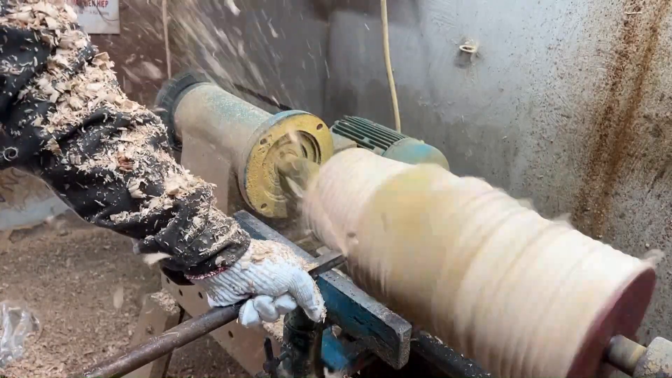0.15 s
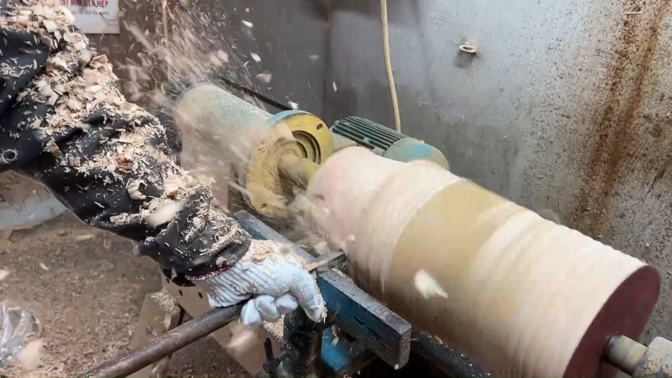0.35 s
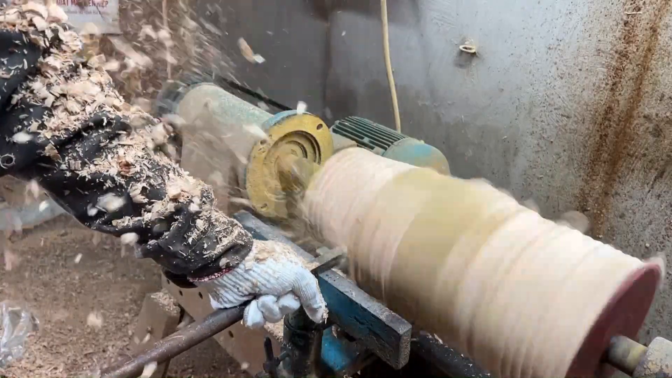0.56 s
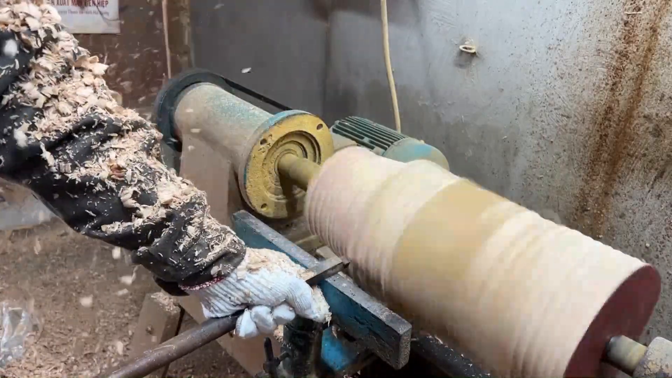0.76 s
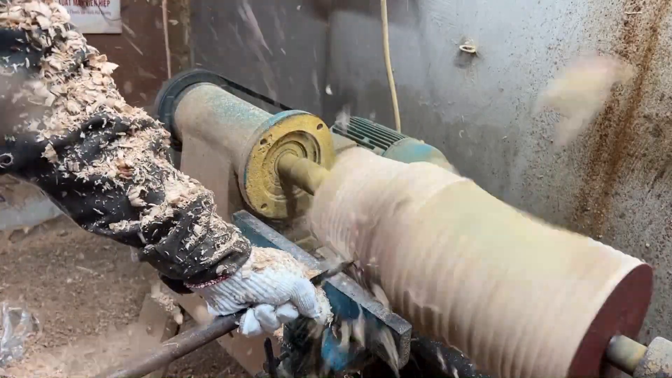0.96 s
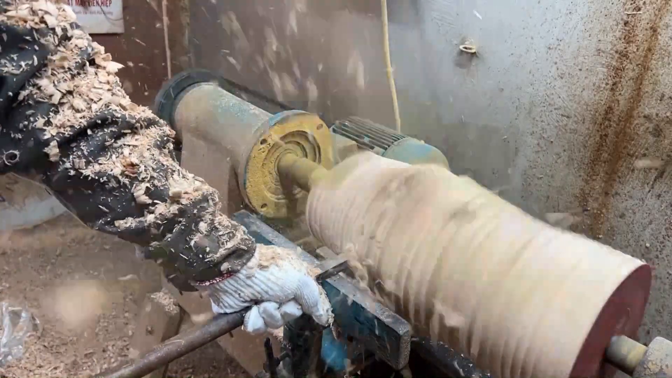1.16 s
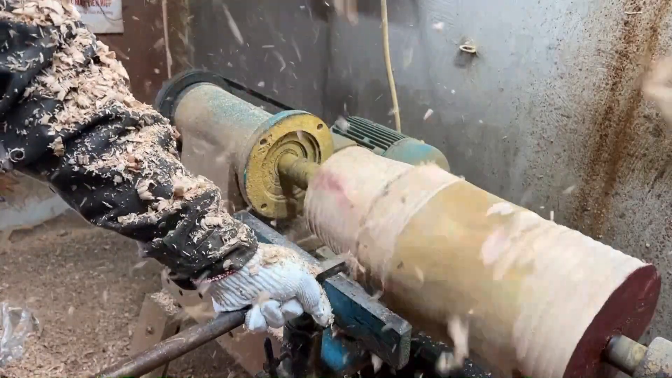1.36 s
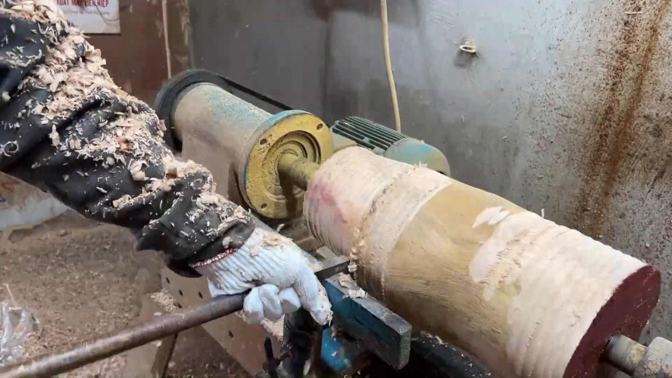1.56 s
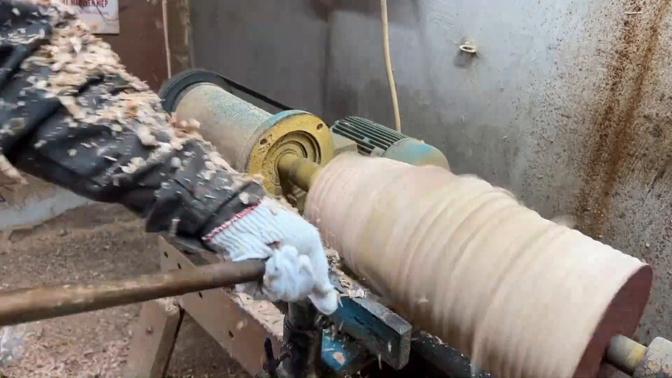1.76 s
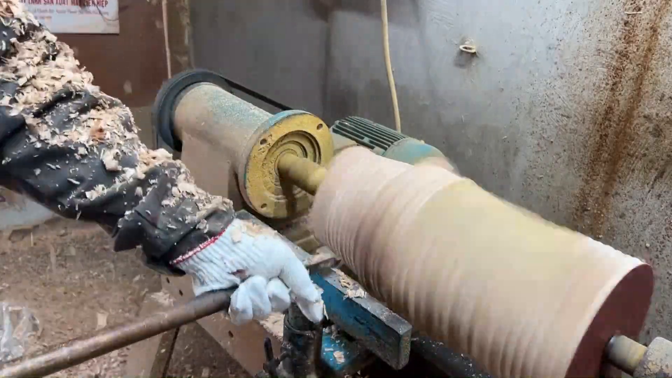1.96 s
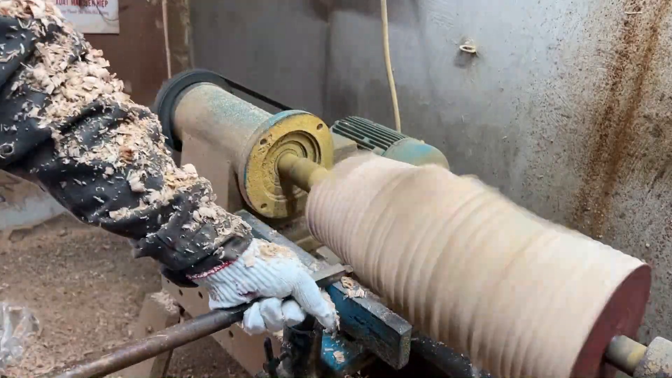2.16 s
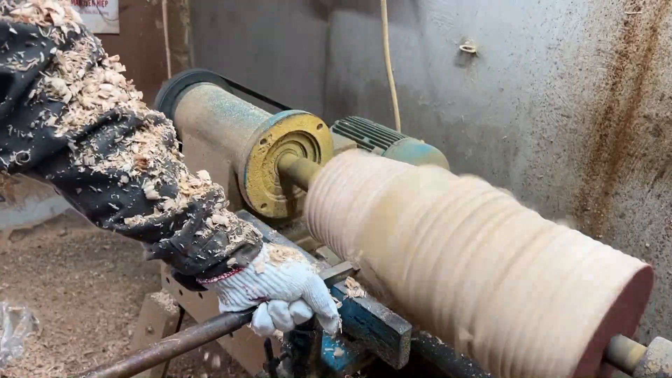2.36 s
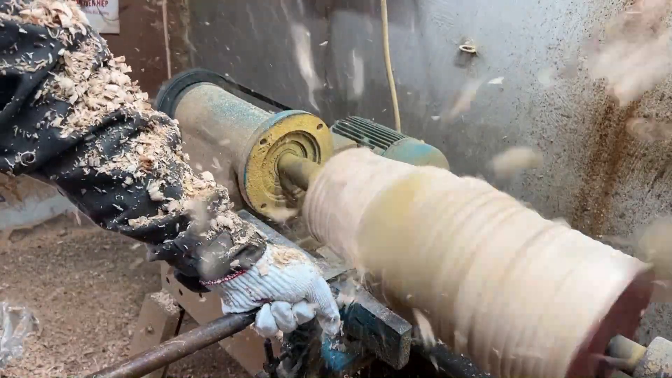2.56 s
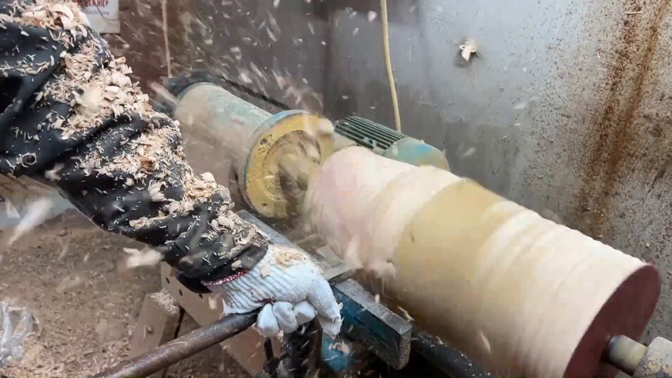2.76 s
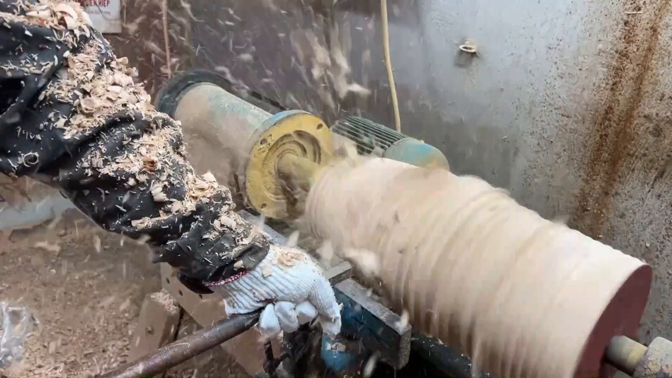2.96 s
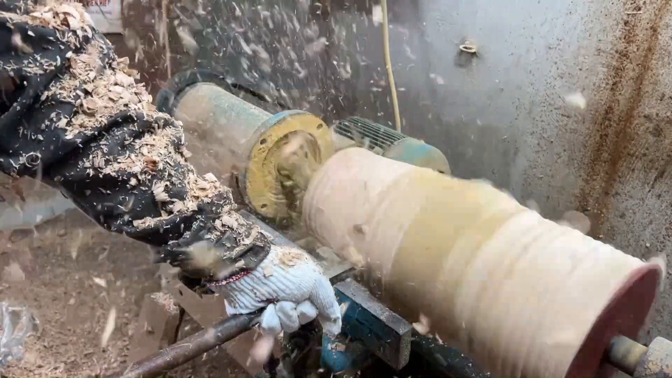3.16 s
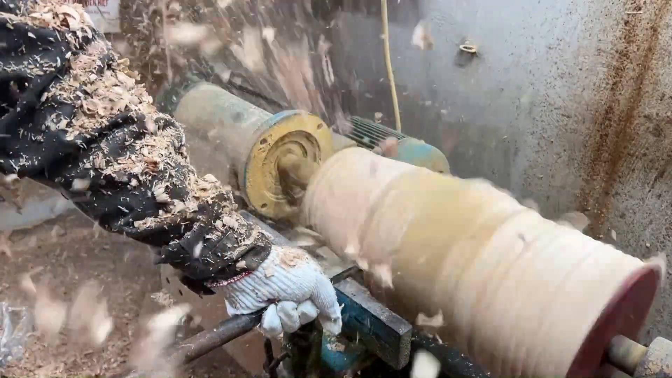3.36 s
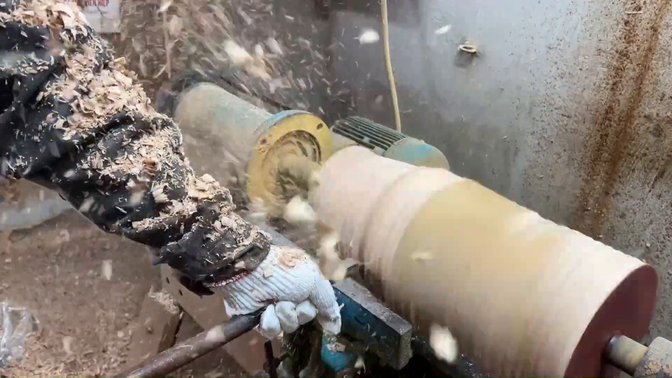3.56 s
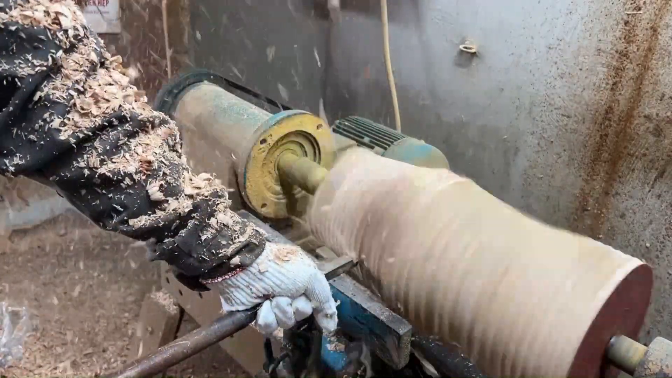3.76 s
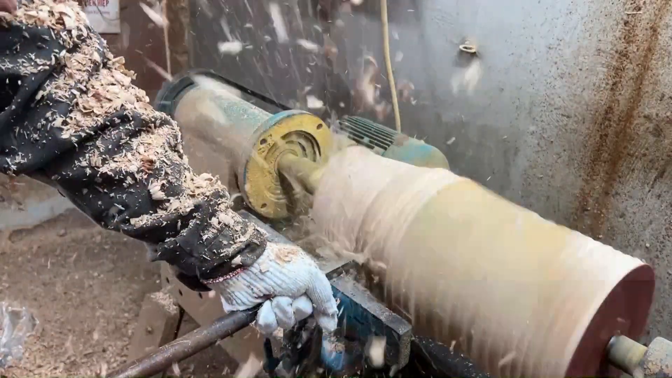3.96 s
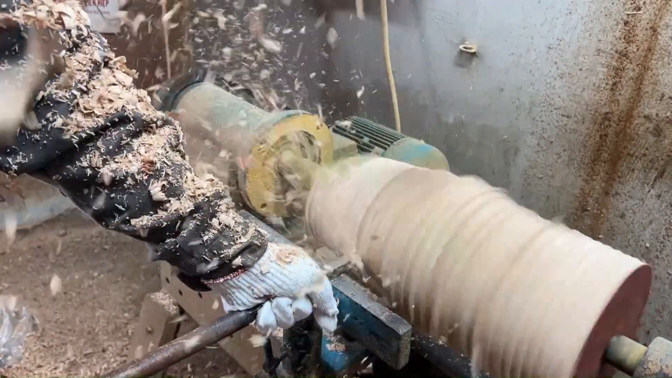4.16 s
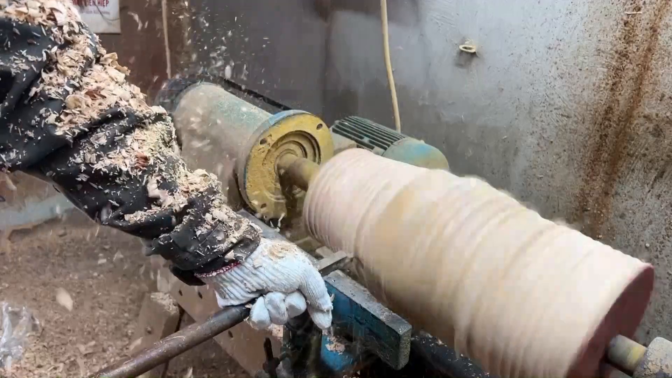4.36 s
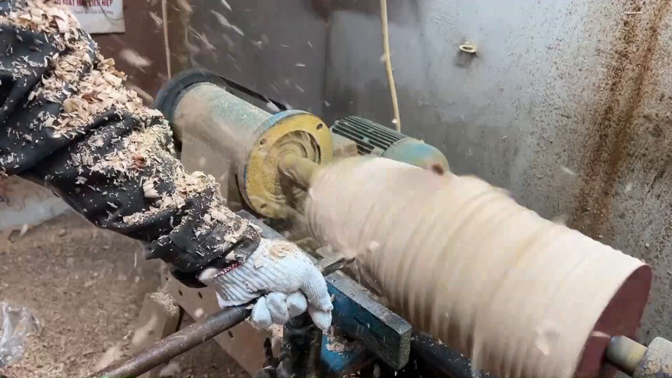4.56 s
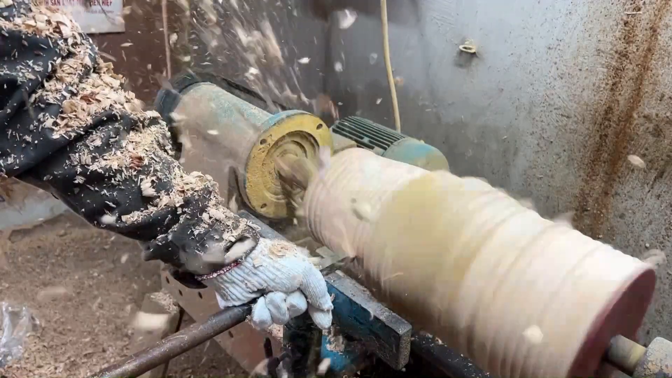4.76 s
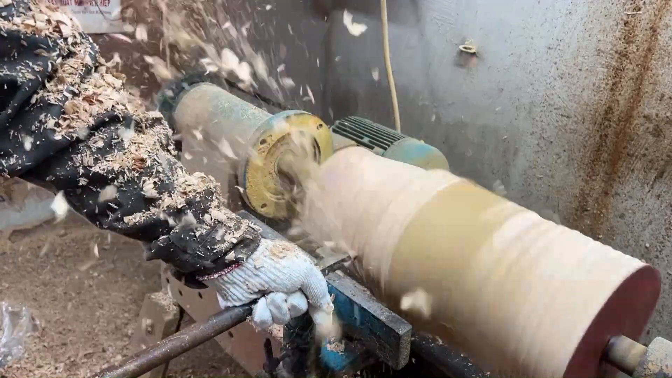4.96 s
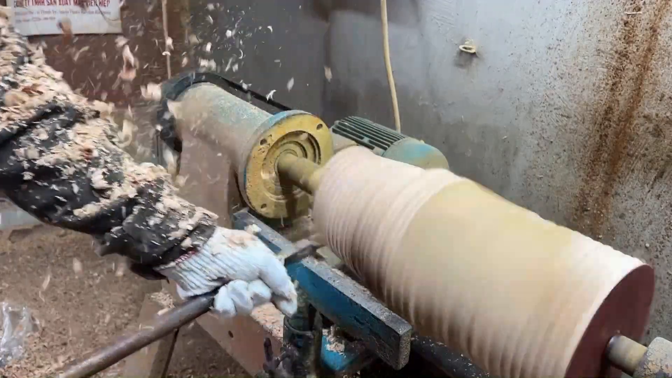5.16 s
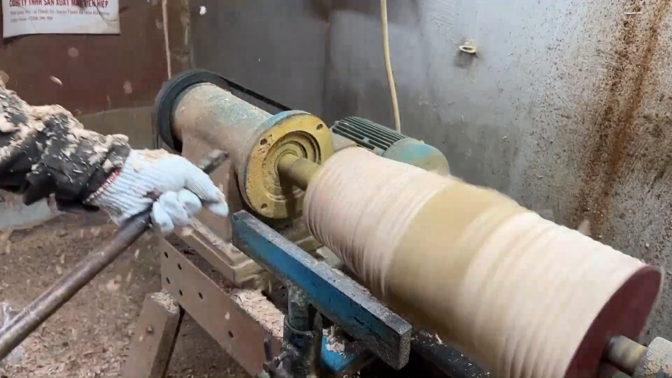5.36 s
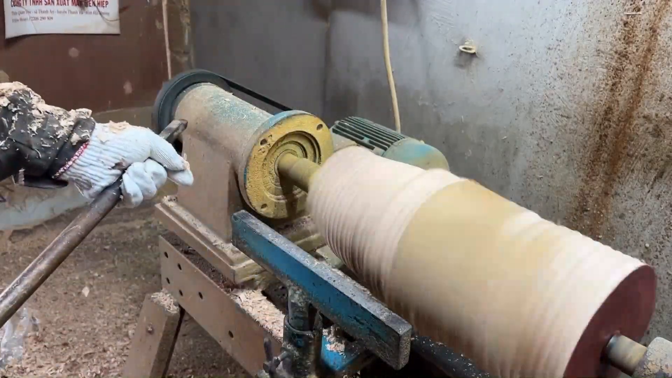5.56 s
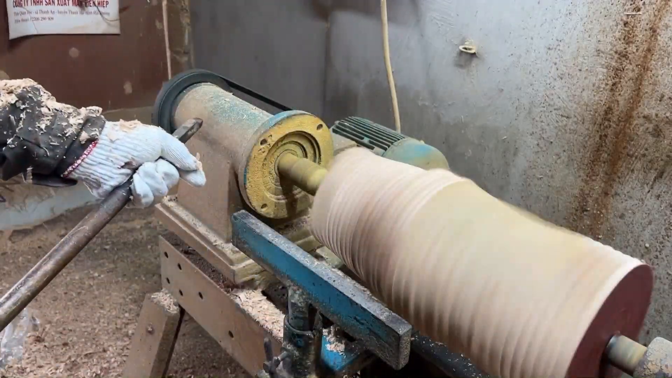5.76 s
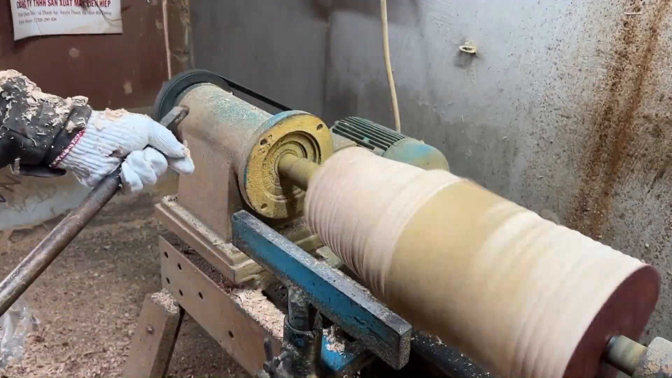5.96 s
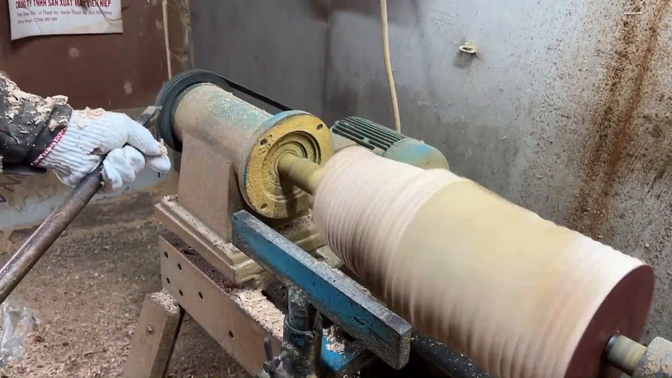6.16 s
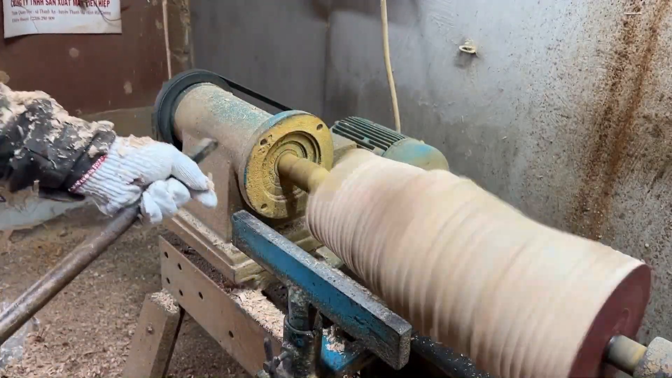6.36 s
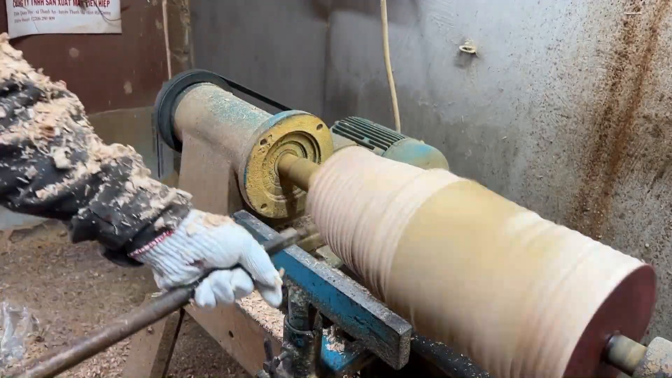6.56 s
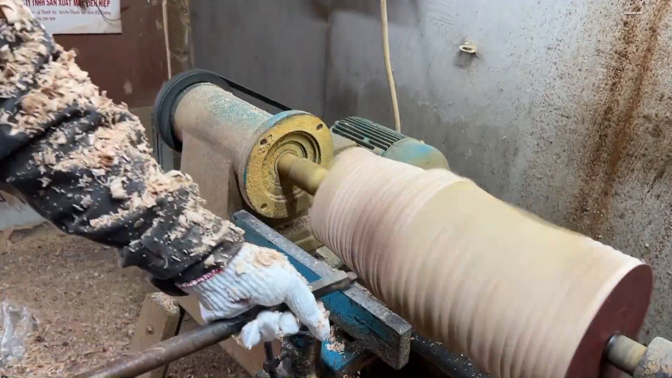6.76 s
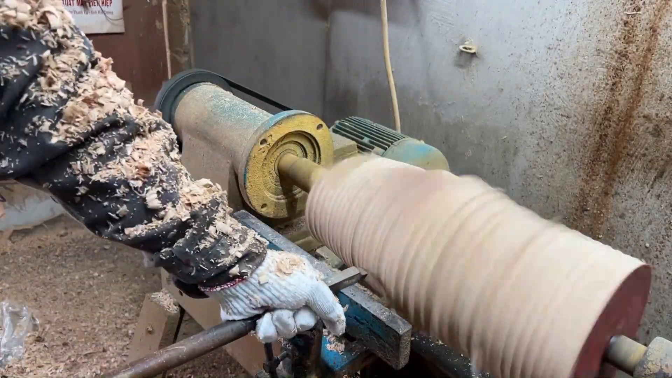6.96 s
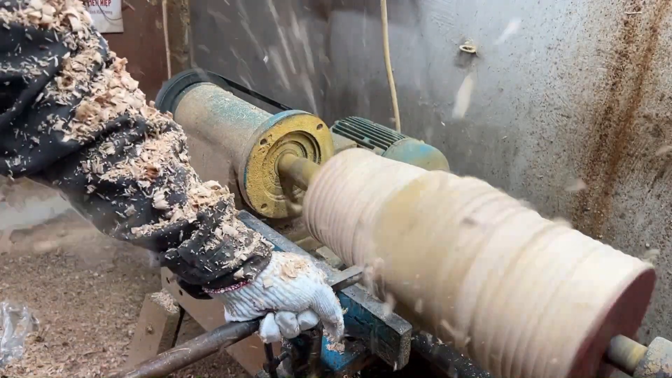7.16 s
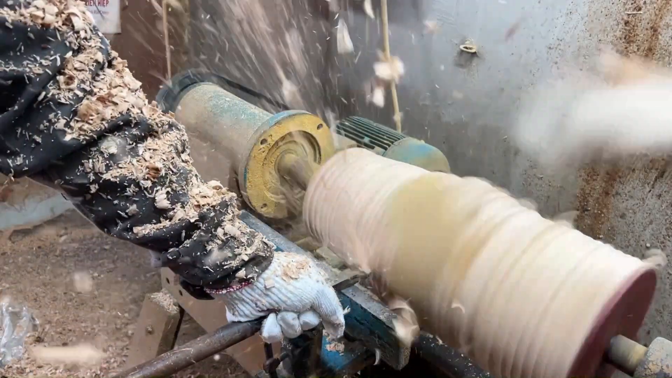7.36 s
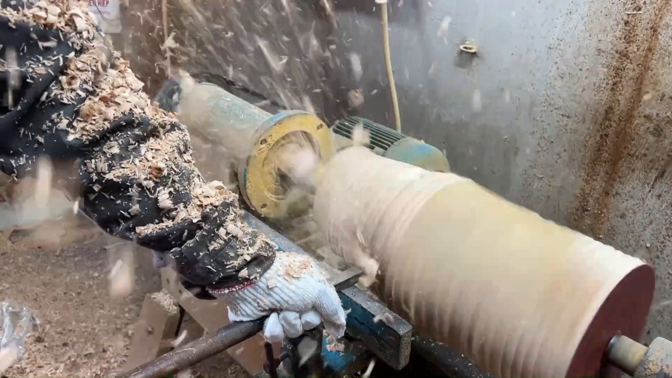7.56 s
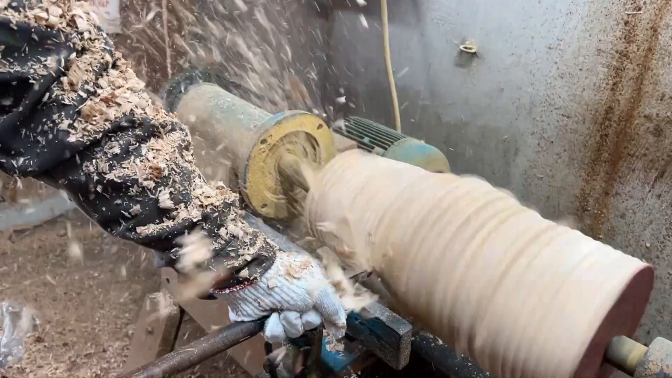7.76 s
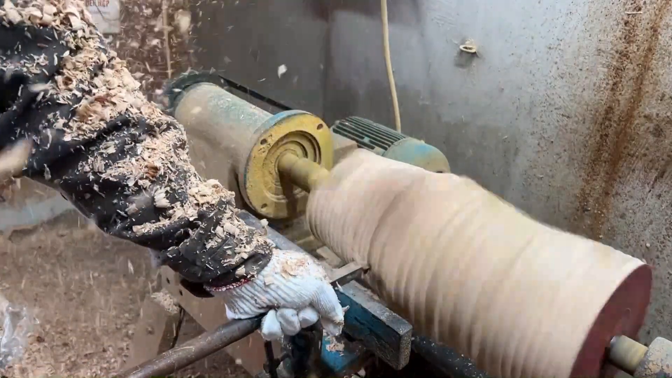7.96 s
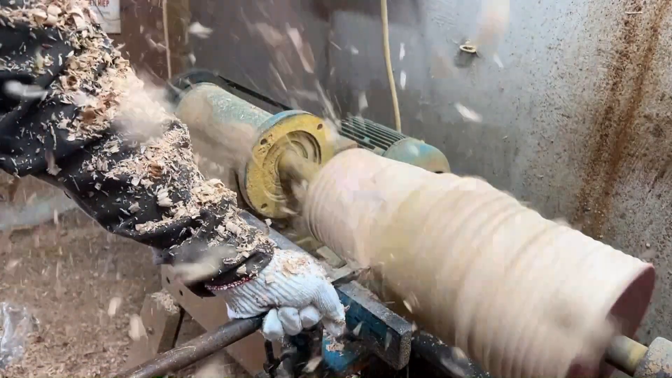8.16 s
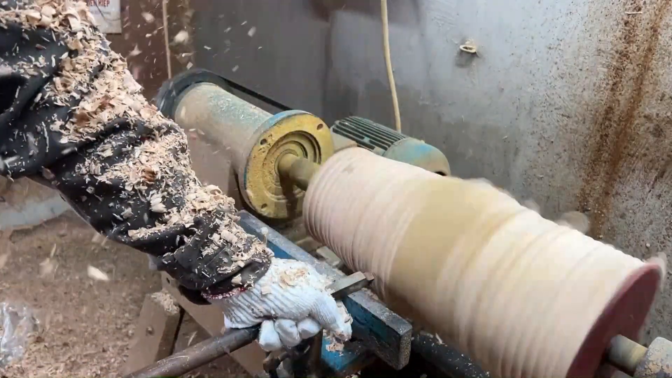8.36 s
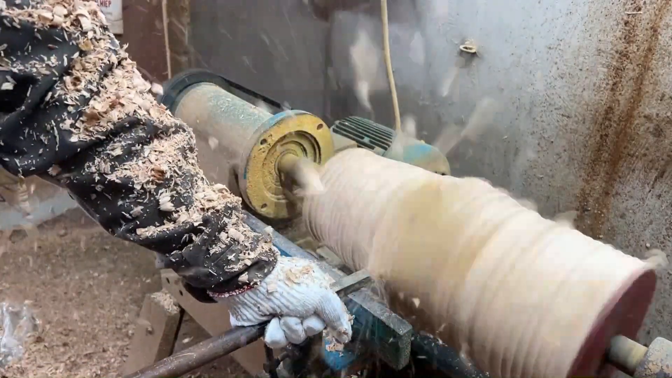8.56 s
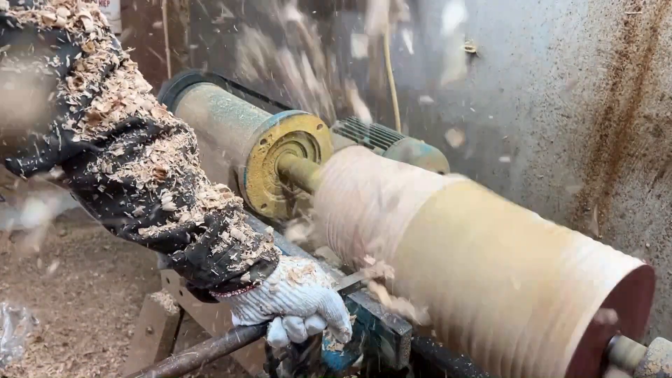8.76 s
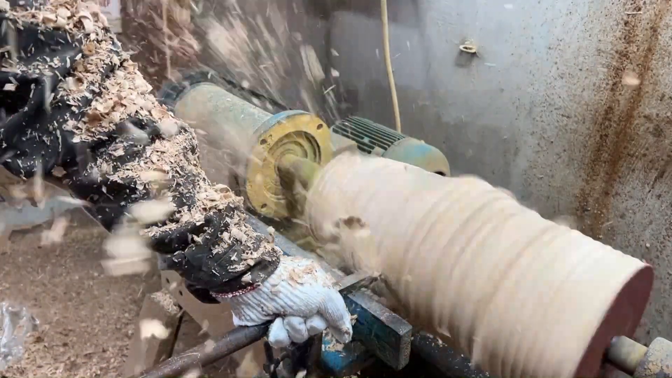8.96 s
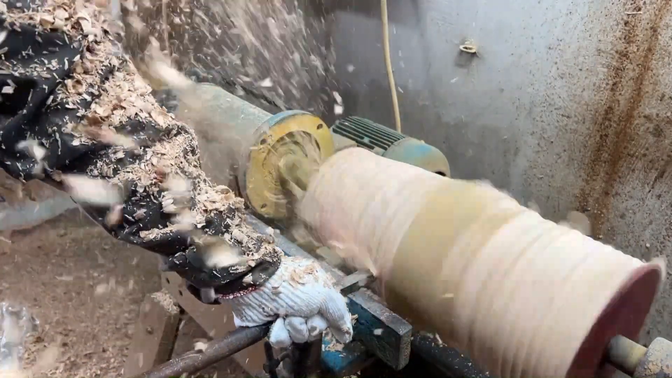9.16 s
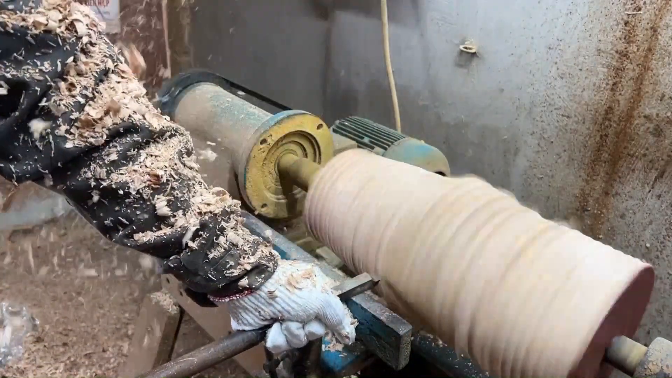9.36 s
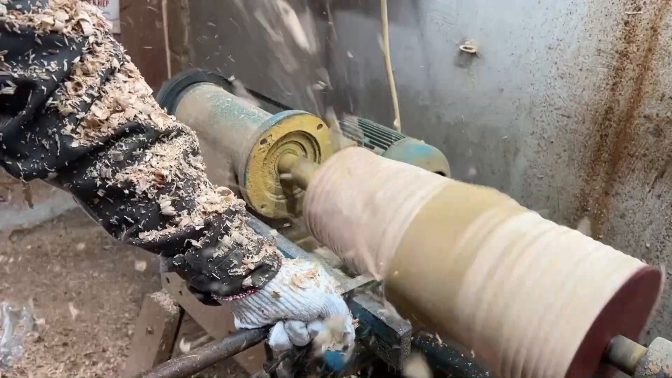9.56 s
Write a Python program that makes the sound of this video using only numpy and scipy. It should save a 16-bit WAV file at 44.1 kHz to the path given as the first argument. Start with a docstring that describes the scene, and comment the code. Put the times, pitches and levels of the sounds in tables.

```python
"""Wood lathe in a small workshop

The motor hums and its speed drive whines while a hand-held gouge cuts a spinning log. Noise tears through
resonances of tool, rest and log as a dense rasp; bursts mark the high side biting the edge about once a turn.
Large chunks ring with gliding resonances, the bed and stand rumble, and slow noise puffs air at the
microphones, which hear mostly unrelated sound."""
import sys
import numpy as np
from scipy import signal
from scipy.fft import rfft, irfft
from scipy.io import wavfile
from scipy.ndimage import uniform_filter1d

SR = 44100
rng = np.random.default_rng(int(sys.argv[2]) if len(sys.argv) > 2 else 0)


def bounce(signal):
    """Save signal as a 16-bit WAV file at the path given by the first command-line argument."""
    frames = np.transpose(np.atleast_2d(signal))
    limited = np.clip(frames, -1, 1)
    pcm = np.round(limited * 32767).astype(np.int16)
    wavfile.write(sys.argv[1], SR, pcm)


N = 423793
STEP = 16  # samples per control step
TIME = np.arange(N // STEP + 1) * STEP / SR  # seconds

# Levels in the tables are set before flicker and the balance of the microphones.
# The high side of the log meets the edge, about once a turn. Each row: time in seconds, hiss peak in dB,
# ring rms in dB, spray rms in dB, 60 dB decay and rise in seconds, both scaled again for each range.
BITES = [(0.0314, -21, -22.5, -39, 0.1, 0.0049), (0.0907, -32, -22, -39, 0.13, 0.004),
         (0.807, -17.5, -20, -36, 0.11, 0.0018), (0.8654, -12, -16.5, -23, 0.12, 0.0028),
         (0.915, -19, -22, -35, 0.21, 0.0049), (0.9652, -10.5, -17, -25, 0.12, 0.0037),
         (1.0243, -8.5, -13, -24, 0.1, 0.0032), (1.0854, -16, -13.5, -33, 0.12, 0.004),
         (1.095, -9, -21, -18.5, 0.068, 0.004), (1.1634, -22, -18, -38, 0.11, 0.0045),
         (1.1802, -16, -33, -36, 0.14, 0.0045), (1.2916, -36, -16, -45, 0.075, 0.0048),
         (1.308, -15, -14.5, -37, 0.15, 0.0047), (1.6304, -38.5, -53, -60, 0.45, 0.0085),
         (1.6825, -28, -20, -48, 0.11, 0.01), (1.7075, -29, -23, -44, 0.11, 0.0068),
         (2.1975, -33, -53, -44, 0.055, 0.0042), (2.247, -41, -48, -45, 0.12, 0.0045),
         (2.2977, -40, -46, -47, 0.17, 0.0045), (2.3491, -36, -42, -44, 0.12, 0.0049),
         (2.381, -28, -36.5, -44, 0.32, 0.0045), (2.4326, -13.5, -23, -29, 0.16, 0.0052),
         (2.4824, -12.5, -19.5, -24.5, 0.17, 0.005), (2.543, -10.5, -20.5, -27, 0.14, 0.0059),
         (2.6005, -12, -18, -26, 0.14, 0.0077), (2.7064, -19.5, -35, -45, 0.21, 0.0073),
         (2.758, -17, -24, -30, 0.2, 0.0048), (2.8147, -11.5, -21.5, -27.5, 0.13, 0.0045),
         (2.8735, -16, -19.5, -29, 0.16, 0.0073), (2.929, -16, -20, -30, 0.19, 0.0068),
         (2.9791, -17, -23.5, -36, 0.19, 0.0048), (3.036, -17.5, -20.5, -34, 0.1, 0.0034),
         (3.2934, -31, -27, -33, 0.15, 0.0051), (3.3504, -28, -34, -44, 0.15, 0.0045),
         (3.4084, -25.5, -26, -39, 0.31, 0.0087), (3.463, -32, -32, -37.5, 0.35, 0.0041),
         (3.6877, -30, -27.5, -41, 0.32, 0.0047), (3.7414, -12.5, -17, -28, 0.095, 0.0035),
         (3.8726, -19, -25, -27, 0.07, 0.0042), (4.031, -27, -27, -44, 0.13, 0.0041),
         (4.3434, -37, -42, -51, 0.31, 0.0045), (4.3864, -16.5, -24.5, -31, 0.13, 0.0048),
         (4.4298, -17.5, -27, -35, 0.18, 0.0045), (4.8474, -37, -34, -42, 0.12, 0.0045),
         (6.9985, -35, -40, -43, 0.11, 0.0045), (7.0347, -23, -30.5, -41, 0.27, 0.0045),
         (7.0774, -15.5, -25, -32, 0.21, 0.0041), (7.091, -11, -26, -24, 0.11, 0.0045),
         (7.134, -11.5, -21, -23.5, 0.16, 0.0049), (7.187, -10, -20, -24, 0.17, 0.0056),
         (7.241, -12.5, -18, -27, 0.17, 0.0048), (7.2975, -8.5, -18.5, -23, 0.12, 0.0033),
         (7.3537, -14, -25, -28, 0.14, 0.0045), (7.4064, -16, -22, -29, 0.12, 0.004),
         (7.46, -15, -19, -31, 0.19, 0.0038), (7.519, -13, -15.5, -25, 0.094, 0.0038),
         (7.568, -22, -24, -34, 0.45, 0.0068), (7.9798, -20, -24.5, -34, 0.45, 0.0053),
         (8.4477, -16, -22.5, -23.5, 0.23, 0.0032), (8.5066, -8.5, -15, -22, 0.1, 0.0052),
         (8.5534, -10, -19.5, -23, 0.11, 0.0045), (8.613, -8, -20, -22, 0.065, 0.0041),
         (8.666, -15, -18, -23, 0.13, 0.0062), (8.7213, -12, -19, -19, 0.075, 0.0033),
         (8.7744, -21, -21, -33, 0.14, 0.004), (8.8847, -30, -23, -27.5, 0.12, 0.0051),
         (8.936, -21.5, -21, -32, 0.11, 0.0049), (9.413, -35, -39, -46, 0.17, 0.0045),
         (9.4474, -20.5, -23.5, -32, 0.24, 0.0064), (9.5015, -24, -23.5, -33, 0.15, 0.004),
         (9.5545, -18.5, -21.5, -28.5, 0.15, 0.0045)]
# Broad colour of the rasp. Each row: frequency in Hz, relative density in dB per Hz.
RASP = [(35, -47), (60, -22), (244, 1.5), (294, 3.5), (492, -7.5), (785, -9), (1310, -10.5), (1620, 2.5),
        (2000, -10), (3760, -2), (4220, -12.5), (7940, -17), (16000, -29)]
# Resonances heard wherever the gouge cuts. Each row: centre in Hz, width in Hz, relative level in dB.
LATHE_MODES = [(792.4, 26, -1), (920, 88, -3), (4833, 200, -4.5), (5120, 200, -12.5), (6270, 28, -2.5),
               (6330, 54, -33), (7800, 270, -12.5), (9100, 390, -16.5), (10800, 130, -17)]
# Low rumble. Each row: time in seconds, levels of bed, stand and air on the microphones in dB.
RUMBLE = [(0.0, -54, -63, -75), (0.21, -44.5, -48.5, -64), (0.53, -65, -73, -89), (0.7, -62, -68, -78),
          (0.88, -39, -34.5, -50), (1.34, -34, -38, -60), (1.55, -48.5, -57.5, -70),
          (1.76, -40.5, -37, -38.5), (2.33, -66, -68.5, -100), (2.49, -32.5, -49, -59),
          (2.81, -31, -35, -48), (3.21, -41, -58, -75), (3.29, -39, -49, -72), (3.82, -51, -60, -79),
          (4.47, -53.5, -53.5, -80), (4.65, -61, -89, -93), (4.9, -52, -62.5, -77),
          (5.59, -65.5, -64.5, -82), (6.1, -54, -55, -66), (6.42, -60, -60.5, -83), (6.53, -54, -51.5, -59),
          (7.04, -51.5, -59.5, -83), (7.17, -30.5, -33, -48), (7.25, -29.5, -56, -72),
          (7.36, -34, -28, -53), (8.3, -50.5, -49, -55), (8.62, -31.5, -32.5, -40), (9.15, -40.5, -39, -44),
          (9.56, -49, -38.5, -29), (9.61, -21, -44, -44)]
# Single puffs of air. Each row: time of the middle in seconds, level in dB, length in seconds.
PUFFS = [(0.248, -51, 0.038), (1.04, -45, 0.098), (1.28, -52, .06), (1.6, -55, .04), (2.17, -62, .08),
         (2.512, -49, 0.048), (4.28, -65, .08), (4.92, -63, 0.087), (5.06, -68, .06), (5.27, -63, 0.087),
         (5.88, -63, .1), (6.074, -52, 0.067), (6.37, -63, 0.055), (6.5, -65, 0.055), (7.16, -49, 0.046),
         (7.38, -47, 0.084), (7.793, -41, 0.077), (7.894, -41, 0.047), (8.067, -43, 0.027),
         (8.656, -28, 0.13), (8.986, -31.5, .08), (9.25, -38, 0.085)]


def undb(db):
    """Amplitude of a level in dB."""
    return np.exp(np.log(10) / 20 * np.asarray(db))


def curves(table):
    """Each column of a table, after the time, as a value per control step."""
    s, *columns = np.transpose(table)
    return [np.interp(TIME, s, column) for column in columns]


def walk(rate):
    """Random levels 1 / rate s apart, joined smoothly; spread near 1."""
    k = int(SR / STEP / rate)
    levels = rng.standard_normal(len(TIME) // k + 2)
    joined = np.interp(TIME * rate, np.arange(len(levels)), levels)
    return 1.2 * uniform_filter1d(joined, k // 2)


def audio(control):
    """A control held over its samples."""
    return np.repeat(control, STEP)[:N]


def fibres(scatter_db):
    """Dense tears, a few stronger than the rest; each microphone hears its own noise at shared strengths."""
    sizes = undb(scatter_db * np.minimum(rng.exponential(size=N), 4))
    return rng.standard_normal((2, N)) * sizes / np.sqrt(np.mean(sizes ** 2))


def colour(x, broad, modes, broad_db, lo_hz, hi_hz, size=4096):
    """Causal filter: a broad spectrum plus resonances, kept between two edges; white rms 1 stays rms 1."""
    f = np.maximum(np.arange(size // 2 + 1), .5) * SR / size
    broad_hz, density_db = np.array(broad).T
    power = undb(2 * (broad_db + np.interp(np.log(f), np.log(broad_hz), density_db)))
    for hz, width, db in modes:
        power = power + undb(2 * db) / (1 + (2 * (f - hz) / width) ** 2) ** 2
    power = power / (1 + (lo_hz / f) ** 10) / (1 + (f / hi_hz) ** 10)
    # folding the cepstrum forward gives minimum phase: the response starts at once
    cepstrum = irfft(.5 * np.log(power + 1e-14))
    cepstrum[1:size // 2] *= 2
    cepstrum[size // 2 + 1:] = 0
    response = irfft(np.exp(rfft(cepstrum)))
    response = response / np.sqrt(np.sum(response ** 2))
    return signal.oaconvolve(x, response[None], axes=1)[:, :N]


def ringing(x, gain, hz, width):
    """A resonance whose centre moves: shift the centre to zero, smooth, shift back; gain 1 at the centre."""
    turn = np.exp(2j * np.pi * np.cumsum(audio(hz)) / SR)
    pole = np.exp(-np.pi * width / SR)
    centred = x * (audio(gain) * turn.conj())
    smooth = signal.lfilter([1 - pole], [1, -pole], centred)
    return 2 * (smooth * turn).real


def bells(table):
    """Power envelope of soft events: bells of their length."""
    return sum(undb(2 * db) * np.exp(-(2 * (TIME - s) / length_s) ** 2) for s, db, length_s in table)


def passes():
    """Ring, spray and body levels in dB; each pass dies away once the gouge is lifted."""
    # Passes of the gouge between the bites, one table each.
    # Each row: time in seconds, tool ring, chip spray and log body in dB.
    pass_tables = [
        [(0.0, -31, -43, -30.5), (0.058, -30.5, -43, -40), (0.186, -34, -45.5, -33.5),
         (0.384, -39.5, -50.5, -41.5), (0.458, -39, -47, -39.5), (0.555, -41.5, -51, -47)],
        [(0.78, -54, -57, -56), (0.848, -37, -67, -56), (0.886, -31, -62, -47), (0.968, -33, -45, -40),
         (0.998, -30, -43, -37), (1.048, -28, -52, -23.5), (1.144, -29, -49, -23), (1.208, -26, -59, -23),
         (1.266, -37.5, -56, -32.5), (1.35, -40, -73, -49)],
        [(1.61, -66, -71, -67), (1.686, -50, -70, -29), (1.72, -51, -76, -36.5)],
        [(2.36, -55, -65, -58), (2.446, -49, -57, -36), (2.504, -38, -53, -32), (2.572, -35, -44, -27),
         (2.646, -35.5, -48.5, -36.5), (2.792, -32.5, -48, -33), (2.956, -35, -47, -39),
         (3.306, -31.5, -44, -33.5), (3.364, -31.5, -43, -33), (3.398, -33, -42, -31.5), (3.47, -42, -47, -45)],
        [(3.67, -63, -69, -52), (3.746, -31, -42, -44), (3.864, -30.5, -49, -35.5), (3.912, -30.5, -44, -32.5),
         (4.032, -34.5, -47.5, -39), (4.082, -39, -49, -41), (4.19, -41, -51.5, -42)],
        [(4.33, -53, -63, -51), (4.426, -27, -46, -58), (4.548, -40, -51, -42.5), (4.62, -37, -48.5, -41),
         (4.812, -37.5, -46, -39), (4.88, -37, -47, -38.5), (4.975, -41, -52, -47)],
        [(6.98, -50, -67, -57), (7.054, -51, -66, -46), (7.104, -34, -59, -49), (7.17, -28.5, -51, -34),
         (7.218, -27.5, -45, -27.5), (7.274, -27.5, -47, -33), (7.38, -26.5, -40.5, -27),
         (7.662, -31.5, -48, -34), (7.692, -32.5, -44, -31), (7.77, -30, -43, -32)],
        [(7.99, -29, -63, -44), (8.16, -34, -46.5, -38.5)],
        [(8.43, -48, -65, -55), (8.5, -26.5, -65, -43), (8.612, -28, -38, -35), (8.64, -26.5, -46, -32),
         (8.81, -30, -44, -34), (8.984, -32, -45, -34), (9.07, -34, -46, -33), (9.17, -38.5, -46.5, -39.5)],
        [(9.37, -66, -68, -64), (9.468, -55, -62, -56), (9.506, -32, -41, -50), (9.588, -32.5, -44, -42),
         (9.61, -33, -44, -31)],
    ]
    # the last level holds until the lift; then ring, spray and body fall
    lift_after_s, lift_db_per_s = 0.038, np.array([[260], [500], [158]])
    power = 1e-12
    for table in pass_tables:
        since_lift_s = np.maximum(TIME - table[-1][0] - lift_after_s, 0)
        level_db = np.array(curves(table)) - lift_db_per_s * since_lift_s
        power = power + (TIME >= table[0][0]) * undb(2 * level_db)
    return 10 * np.log10(power)


def bites(levels_db, slow, ring, hold):
    """Power envelope of the bites: the edge digs in, holds while the high side passes, then lets go."""
    power = np.zeros(len(TIME))
    for (s, *_, t60, rise_s), db in zip(BITES, levels_db):
        rise_s = slow * max(rise_s, .0005)
        i = int((s - rise_s / 2) * SR / STEP)
        t = TIME[:min(len(TIME) - i, SR // STEP // 3)]  # a third of a second at most
        fall_db = 60 * (t / (ring * t60)) ** hold
        power[i:i + len(t)] += undb(2 * (db - fall_db)) * (1 - np.exp(-t / rise_s)) ** 2
    return power


def skips(length_s):
    """Dip just before each bite, where the low side barely touches the edge; each range scales its depth."""
    depth = 3.5
    return sum(depth * np.sin(np.pi * np.clip((row[0] - TIME) / length_s, 0, 1)) ** 2 for row in BITES)


def chatter(drive, place, flare_db, rate, drift):
    """Each resonance flares and drifts by itself as the edge catches; white rms 1 stays near rms 1."""
    # Resonances of gouge and tool rest. Each row: centre in Hz, width in Hz,
    # relative level in dB at the end of the log, and at its flank.
    tool_modes = [(1652, 72, -6, -1.5), (2217, 48, 1, -8.5), (2375, 89, 4, -16), (2594, 22, 5.5, -11),
                  (2783, 140, -16, -1.5), (3046, 87, -10.5, -5), (3318, 135, -7, -0.5), (3740, 176, -21, 7),
                  (4060, 110, -22, -15)]
    table = np.array(tool_modes)
    gains = undb(table[:, 2:3] + place * (table[:, 3:] - table[:, 2:3]))
    gains = gains / np.sqrt(np.sum(gains ** 2 * np.pi * table[:, 1:2] / SR, axis=0))
    total = 0
    for (hz, width, *_), gain in zip(tool_modes, gains):
        flare = undb(flare_db * walk(rate))
        total = total + ringing(drive, gain * flare, hz * (1 + drift * walk(6.6)), width)
    return total


def tool_ring(ring_db, place, grain, skip, crackle):
    """Tearing fibres ring gouge and rest; a scrape resonance slides with the place of the cut and wavers."""
    ring_bites_db = np.array(BITES)[:, 2]
    power = undb(2 * (ring_db + 1.5 * walk(60)))
    power = power + bites(ring_bites_db, slow=4.3, ring=0.9, hold=1.294)
    # the first instant of a bite cracks
    power = power + bites(ring_bites_db - 1.5, slow=0.34, ring=0.19, hold=0.93)
    ring = undb(0.93 * crackle) * np.sqrt(power)
    tears = fibres(2.8) * audio(ring * undb(0.44 * grain - 1.3 * skip))
    broad = colour(tears, RASP, [], 0, 1703, 3475)
    end_hz, flank_hz = 2310, 3190  # middle of the sliding scrape at the end of the log and at the flank
    scrape_hz = (end_hz + place * (flank_hz - end_hz)) * (1 + 0.066 * walk(12))
    scrape = ringing(broad, undb(1.6 * walk(20)), scrape_hz, 530)
    return 0.64 * broad + 0.32 * scrape + 0.83 * chatter(tears, place, 2.5, 45, 0.0095)


def tearing_hiss(ring_db, spray_db, grain, skip, crackle):
    """Fine tearing in the range between tool ring and chip spray, coloured by the lathe."""
    hiss_db = -5 + ring_db + 0.33 * (spray_db - ring_db)
    bite_hiss_db = np.array(BITES)[:, 1] - 20 * np.log10(3)  # a noise burst peaks at three times its rms
    power = undb(2 * (hiss_db + 1.2 * walk(90))) + bites(bite_hiss_db, slow=2.0, ring=1.0, hold=1.146)
    hiss = undb(1.2 * crackle) * np.sqrt(power)
    tears = fibres(1.3) * audio(hiss * undb(0.27 * grain - 0.47 * skip))
    return colour(tears, RASP, LATHE_MODES, 4.9, 4410, 8740)


def chip_spray(spray_db, grain, skip, crackle):
    """Chips snap off in widely scattered sizes and spray at the top of the spectrum."""
    power = undb(2 * (spray_db + 1.0 * walk(78)))
    power = power + bites(np.array(BITES)[:, 3], slow=0.65, ring=0.5, hold=1.016)
    spray = undb(1.5 * crackle) * np.sqrt(power)
    tears = fibres(5.8) * audio(spray * undb(1.16 * grain - 3.1 * skip))
    return colour(tears, RASP, LATHE_MODES, 2.3, 8660, 22000)


def log_body(body_db, grain, skip):
    """The log resounds; its strongest knock moves along a table of times and wavers a little."""
    # Strongest knock of the log, before it wavers. Each row: time in seconds, frequency in Hz.
    knock = [(0, 744), (1.0, 740), (1.15, 590), (1.75, 550), (2.15, 760), (9.61, 745)]
    bite_body_db = np.array(BITES)[:, 2] - 7
    body = np.sqrt(undb(2 * (body_db + 1.5 * walk(45))) + bites(bite_body_db, slow=0.83, ring=2.4, hold=1.0))
    tears = fibres(1.0) * audio(body * undb(1.7 * grain - 1.0 * skip))
    log = colour(tears, RASP, LATHE_MODES, -1, 454, 1473)
    knock_hz = curves(knock)[0] * (1 + 0.047 * walk(12))
    return 0.77 * log + 0.79 * ringing(log, undb(0.89 * walk(25)), knock_hz, 114)


def bed_and_stand(grain):
    """Bed and stand rumble in two low resonances, with dull bumps and the puffs of air."""
    # Dull bumps. Each row: time of the middle in seconds, level in dB, length in seconds.
    bumps = [(1.04, -30, 0.036), (1.45, -49, 0.054), (1.87, -57, 0.037), (1.95, -42, 0.057),
             (2.06, -41, 0.03), (4.17, -44, 0.074), (5.3, -53, 0.078), (5.89, -50, 0.044), (6.07, -49, .05),
             (6.18, -46, 0.046), (6.66, -52, 0.1), (7.55, -30.5, 0.066), (8.46, -35, 0.022),
             (8.83, -35, .04)]
    bed_db, stand_db, _ = curves(RUMBLE)
    puff_power, bump_power = bells(PUFFS), bells(bumps)
    shake = fibres(0.35) * audio(undb(3.8 * grain))
    bed_power = undb(2 * (bed_db + 1.65 * walk(15))) + undb(2 * -10.5) * puff_power + bump_power
    stand_power = undb(2 * (stand_db + 3.8 * walk(15))) + undb(2 * -8) * puff_power
    stand_power = stand_power + undb(2 * -11.5) * bump_power
    bed = colour(shake * audio(np.sqrt(bed_power)), RASP, [(289.0, 76, 0.71)], 0.81, 206, 435)
    stand = colour(shake * audio(np.sqrt(stand_power)), RASP, [(159.7, 83, 2)], -0.5, 102, 270)
    return bed + stand


def cut():
    """Ranges of one rasp; all follow the uneven grain of the wood, each flickers a little alone."""
    # Where the gouge works. Each row: time in seconds, place from 0 (end of the log) to 1 (flank).
    place_table = [(0, 0.11), (.6, 0.052), (.8, 0.37), (1.4, 0.56), (2.4, 0.75), (2.8, 0.92), (3.1, 0.88),
                   (3.5, 0.54), (3.7, 0.52), (4.2, 0.16), (4.45, 0.24), (5.1, 0.066), (7, 0.81), (7.4, 1),
                   (7.85, 0.65), (8.05, 0.71), (8.3, 0.43), (8.6, 0.97), (9.2, 0.54), (9.61, 0.86)]
    place = np.clip(curves(place_table)[0], 0, 1)
    ring_db, spray_db, body_db = passes()
    grain, skip = walk(55), skips(0.0082)
    crackle = walk(160)  # chips snapping off, heard in all the upper ranges at once
    tool = tool_ring(ring_db, place, grain, skip, crackle)
    high = tearing_hiss(ring_db, spray_db, grain, skip, crackle)
    top = chip_spray(spray_db, grain, skip, crackle)
    low = log_body(body_db, grain, skip) + bed_and_stand(grain)
    # the edge lies left of the microphones; bass and top spread evenly
    left = np.array([[.5], [-.5]])
    return undb(3.5 + 3.2 * left) * tool + undb(6.5 + 3.3 * left) * high + undb(7.5) * top + undb(2.5) * low


def motor():
    """Fan and bearing noise in the resonances of the casing, and the wavering whine of the speed drive."""
    # Broad colour. Each row: frequency in Hz, relative density in dB per Hz.
    broad = [(25, -71), (40, -45), (100, -28), (212, -21), (500, -5.5), (900, -5.5), (1250, -11),
             (1600, -22), (2200, -14.5), (2900, -22.5), (4200, -26), (7300, -28), (8200, -35),
             (11500, -38.5), (13300, -37), (14500, -61)]
    # Humming and whining bands. Each row: centre in Hz, width in Hz, relative level in dB.
    hum_bands = [(829, 29.6, 5), (1576, 380, -7), (1765, 75, -3.5)]
    whine_bands = [(4930, 30, -12), (5020, 25, 0), (5330, 50, -12), (5932, 15, -10), (6070, 170, -12),
                   (6230, 40, -9), (6665, 30, -8), (6990, 45, -7), (12021, 14, -9), (12100, 350, -25),
                   (12300, 29, -17), (12830, 45, -20)]
    # Motor as heard at the microphones. Each row: time in seconds, hum in dB, whine in dB.
    running = [(0, -50, -69), (.7, -47.5, -60), (1.2, -38, -49), (1.55, -53.5, -71.5), (1.8, -45.5, -59.5),
               (2.2, -45.5, -59), (3.6, -50.5, -60), (4.3, -47, -58), (5.2, -45.5, -58.5),
               (5.8, -45, -58.5), (6.3, -44.5, -56.5), (6.9, -44, -57), (7.9, -45.5, -55), (8.4, -45, -59),
               (9.35, -45.5, -56), (9.61, -38, -57)]
    hum_db, whine_db = curves(running)
    hum_noise = fibres(0.32) * audio(undb(hum_db + 1.0 * walk(18)))
    hum = colour(hum_noise, broad, hum_bands, -1.1, 34, 20000)
    whine_noise = fibres(0.55) * audio(undb(whine_db + 0.4 * walk(13)))
    whine = colour(whine_noise, broad, whine_bands, -28, 4000, 21000)
    return undb([[2.6], [3.4]]) * (hum + whine)


def air():
    """Slow pressure puffs, falling steeply with pitch; part of each reaches both microphones."""
    push = fibres(.6)
    shared = push + 0.046 * push[::-1]
    swell = colour(shared, [(20, -11), (50, -2.5), (100, 6.0), (200, -12)], [], 0, 24, 134)
    power = undb(2 * (curves(RUMBLE)[2] + 1.7 * walk(9))) + bells(PUFFS)
    return audio(np.sqrt(power)) * swell


def glide(width):
    """Large chunks break loose: noise passes twice through one narrow, gliding woody resonance."""
    # Each row: start in seconds, length in seconds, first and last frequency in Hz before wavering, level in dB.
    chunks = [(1.03, 0.18, 710, 480, -26), (1.192, .09, 676, 420, -30), (1.674, 0.093, 416, 690, -30.5)]
    fade_s = 0.013
    hz, gain = np.full(len(TIME), 1. * chunks[0][2]), 0
    for s, length_s, first_hz, last_hz, db in chunks:
        hz = np.where(TIME >= s, np.interp(TIME, [s, s + length_s], [first_hz, last_hz]), hz)
        gain = gain + undb(db) * np.clip(np.minimum(TIME - s, s + length_s - TIME) / fade_s, 0, 1)
    hz = hz * (1 + .05 * walk(40))
    gain = gain * undb(3.0 * walk(60)) / np.sqrt(width / SR)
    once = ringing(rng.standard_normal((2, N)), gain, hz, width)
    return ringing(once, np.ones(len(TIME)), hz, width)


def scene():
    """The cut, its flying chunks, the motor and the moving air add up at the microphones."""
    return cut() + glide(100) + motor() + air()


def record(dry):
    """The recorder rounds the loudest peaks and cuts the top steeply."""
    steep = signal.ellip(10, .2, 75, 15850, fs=SR, output="sos")  # low-pass edge in Hz
    return signal.sosfilt(steep, np.tanh(dry))


dry = scene()
out = record(dry)
bounce(out)
```